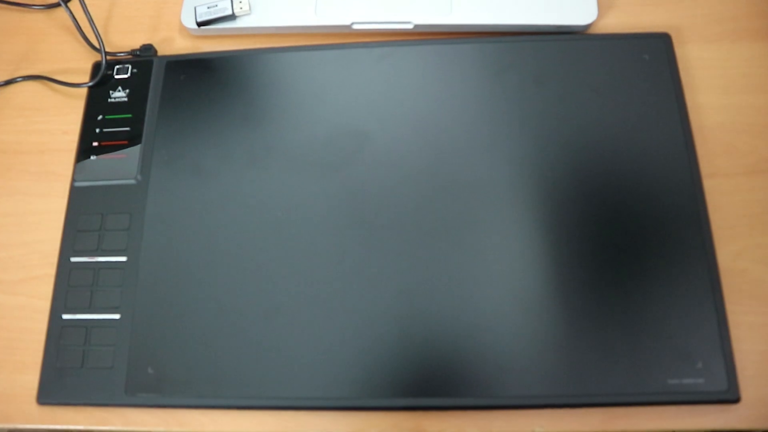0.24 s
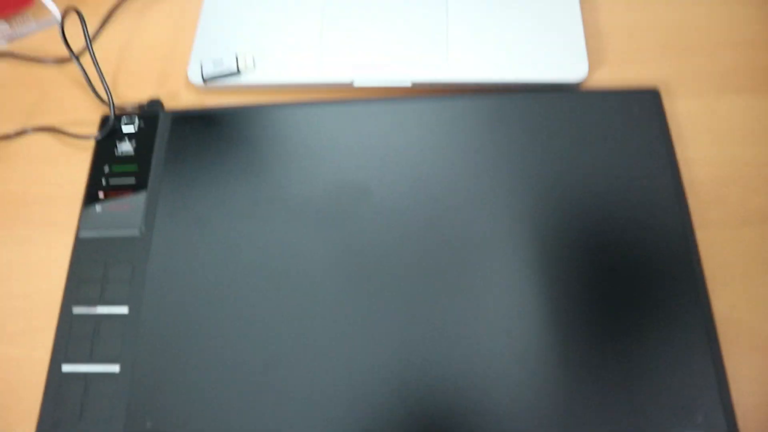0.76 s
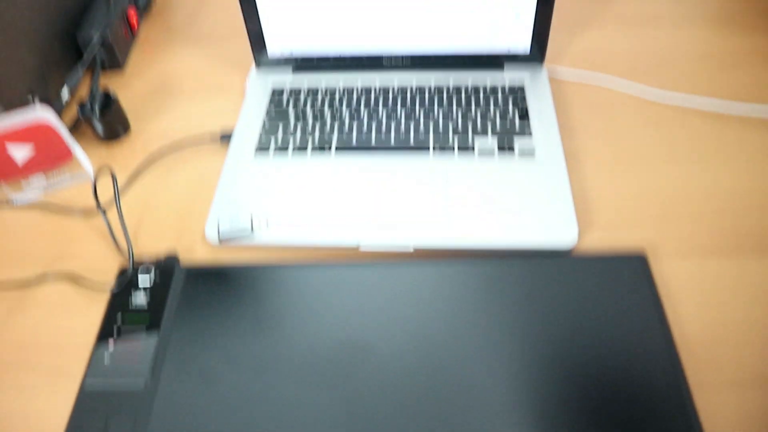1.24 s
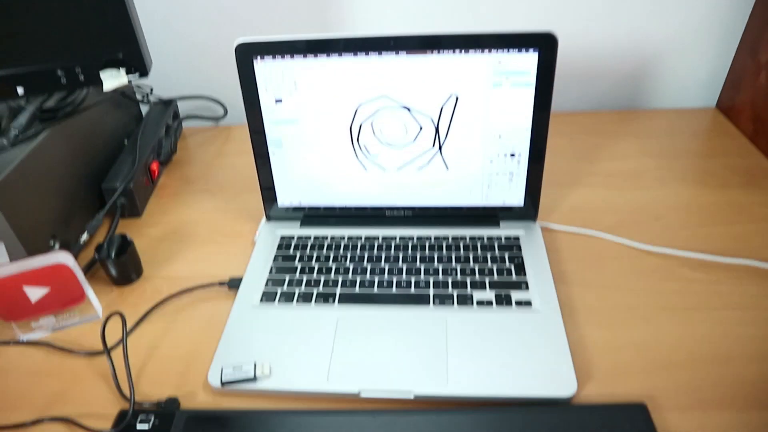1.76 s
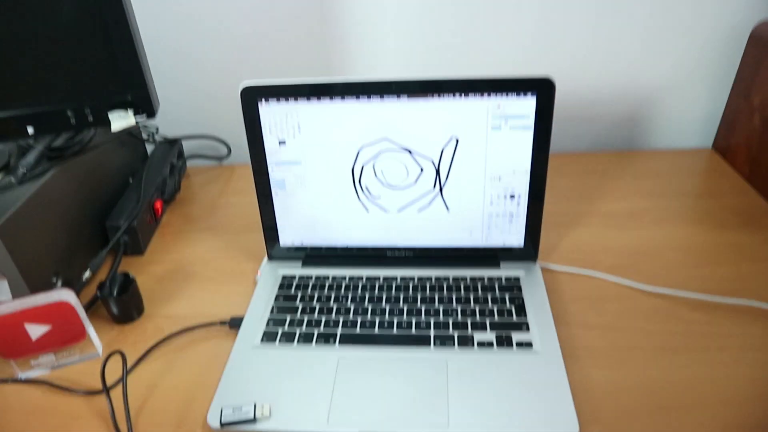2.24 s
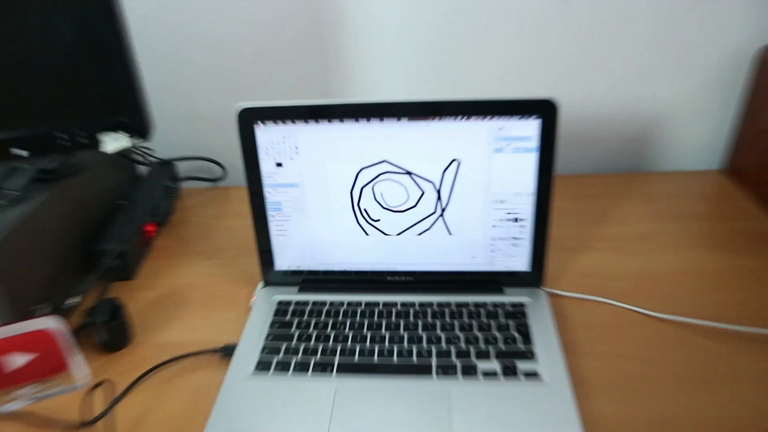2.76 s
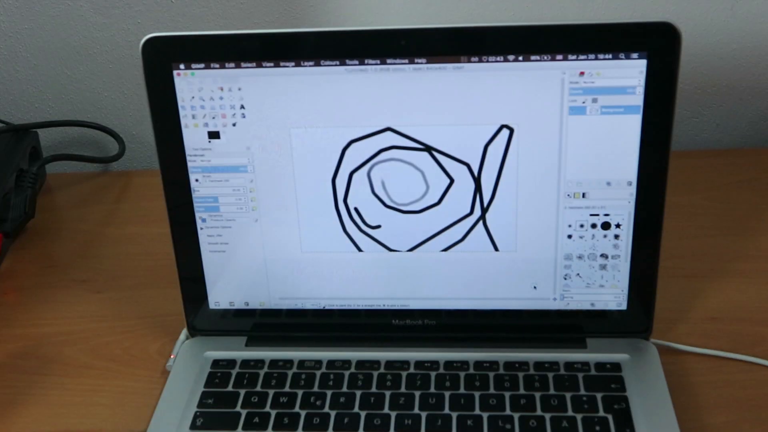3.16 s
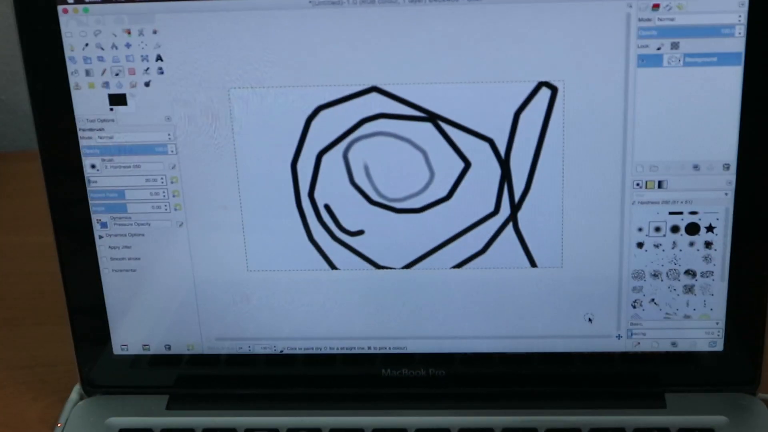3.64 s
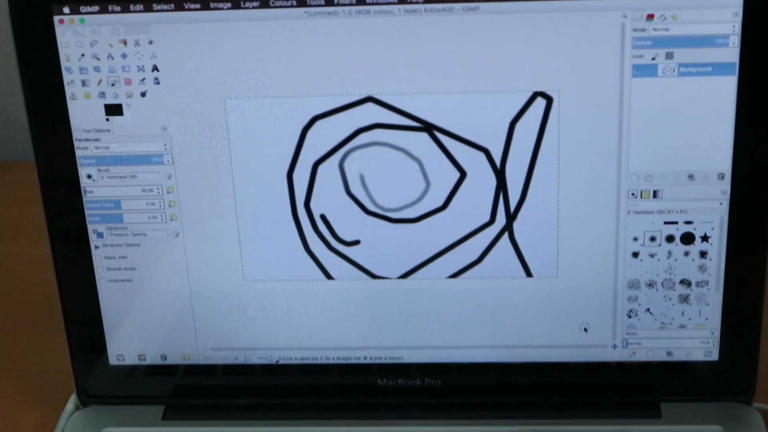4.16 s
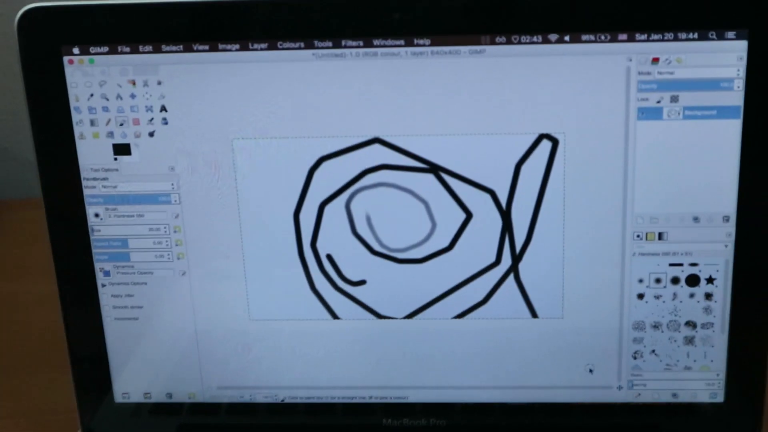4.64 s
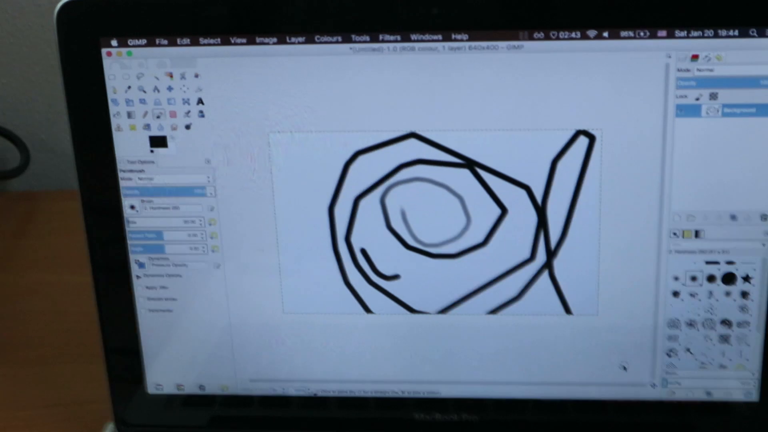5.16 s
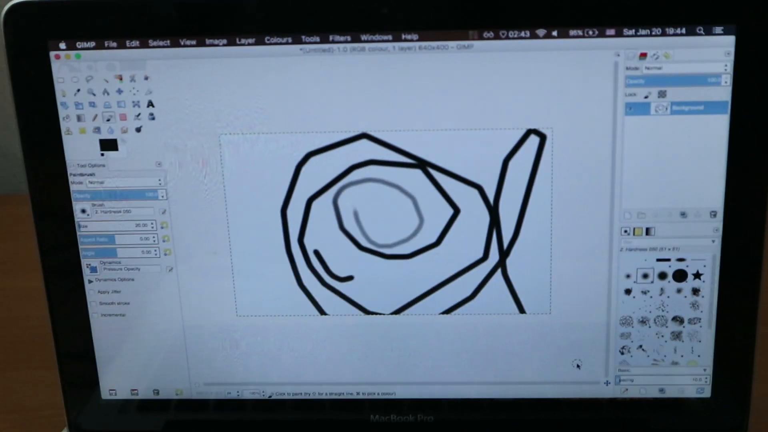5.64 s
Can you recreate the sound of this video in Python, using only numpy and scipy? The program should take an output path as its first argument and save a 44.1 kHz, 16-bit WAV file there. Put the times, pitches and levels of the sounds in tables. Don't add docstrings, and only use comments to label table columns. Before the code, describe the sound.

Irregular light plastic clicks, a few hard and bright, mix with short dry rubs and dull desk bumps in a quiet small room.

```python
import sys
import numpy as np
from scipy import signal
from scipy.fft import rfft, irfft, next_fast_len
from scipy.io import wavfile
from scipy.ndimage import uniform_filter1d, map_coordinates

SR = 44100
rng = np.random.default_rng(int(sys.argv[2]) if len(sys.argv) > 2 else 0)


def invert_db(level):
    return 10 ** (np.asarray(level, dtype=float) / 20)


def output_pcm(signal):
    pcm = np.clip(np.atleast_2d(signal).T, -1, 1) * 32767
    wavfile.write(sys.argv[1], SR, np.round(pcm).astype(np.int16))


N = 260190
IMPACT_T = np.arange(4096) / SR
LEAD = 256


def unit(x):
    return x / np.sqrt(np.mean(x ** 2) + 1e-20)


def peak_one(mid_side):
    return mid_side / np.abs(mid_side[0]).max()


def along(points, hz):
    f, v = np.transpose(points)
    return np.interp(np.log(hz + 1), np.log(f + 1), v)


def filtered(x, response):
    n = x.shape[-1]
    m = next_fast_len(n + 4096)
    spectrum = rfft(x, m) * response(np.fft.rfftfreq(m, 1 / SR))
    return irfft(spectrum, m)[..., :n]


def stereo(mid_side):
    mid, side = mid_side
    return np.array([mid + side, mid - side])


def wobble(rate):
    knots = rng.standard_normal(int(N * rate / SR) + 4)
    return map_coordinates(knots, [np.arange(N) * rate / SR])


def add(track, s, sound):
    at = round(s * SR)
    track[:, at:at + sound.shape[1]] += sound[:, :track.shape[1] - at]


def decay(t60):
    return invert_db(-60 * IMPACT_T / t60)


def resonances(modes, f, scatter_db):
    hz, width, mid_db, side_db = np.transpose(modes)[:, :, None]
    width = np.maximum(width, hz / 22)
    scatter = scatter_db * rng.standard_normal((2, len(modes), 1))
    gains = invert_db(np.array([mid_db, side_db]) + scatter)
    signs = (-1.) ** np.arange(len(modes))[:, None]
    bells = 1j * f * width / (hz ** 2 - f ** 2 + 1j * f * width)
    return np.sum(signs * gains * bells, axis=1) * [[1], [1j]]


# frequency in Hz, level in dB per Hz.
AIR = [(15, -36), (25, 1), (161, 0), (470, -8), (1010, -11), (2330, -18), (11500, -39), (15800, -60)]
AIR_SIDE = [(15, -82), (25, -36), (276, -6), (600, -15.5), (1390, -17.5), (1820, -15), (2520, -19.5),
            (15800, -36)]


def background():
    z = signal.stft(rng.standard_normal((2, N)), nperseg=512)[2]
    patches = uniform_filter1d(rng.standard_normal(z.shape[1:]), size=6, axis=0)
    patches = uniform_filter1d(patches, size=10, axis=1)
    pair = signal.istft(z * invert_db(2.2 * unit(patches)), nperseg=512)[1][:, :N]
    mid, side = filtered(pair, lambda f: invert_db([along(AIR, f), along(AIR_SIDE, f)]))
    level = invert_db(-55.5 + 0.66 * wobble(2.88))
    return level * stereo([unit(mid), invert_db(-5.0) * unit(side)])


# frequency in Hz, width in Hz, centre level in dB,
# level in dB of the part opposed left to right.
PANEL = [(627, 78, 1, -7), (1033, 119, -1, -5), (1332, 145, 1.5, -8), (1589, 56, -4.5, 3.5),
         (1705, 69.4, -6, -29), (1809, 32.4, -1.5, -31), (2103, 66, -3, 8), (2340, 153, -4.5, -1),
         (2640, 96, -3, 1), (3292, 260, -7, -31), (3680, 80, -26.5, -8.5), (4160, 67, -15.5, -6),
         (4840, 270, -53, -16.5)]


def panel(f, scatter_db):
    return resonances(PANEL, f, scatter_db)


# frequency in Hz, width in Hz, centre level in dB, opposed level in dB.
DESK = [(45.8, 14, -7.5, -21), (108, 31, 0, -35), (170, 95, 2.5, -15), (255, 187, 0.5, -14),
        (315.7, 103, 0.5, -6), (475, 79, -7, -8.5)]


def desk(f, scatter_db):
    return resonances(DESK, f, scatter_db)


def scratch(slips):
    nib = lambda f: 1 + invert_db(5.5) * 1j * f * 150 / (1370 ** 2 - f ** 2 + 1j * f * 150)
    return filtered(slips, lambda f: panel(f, 0) * [nib(f), invert_db(3 + 0 * f)])


# frequency in Hz, level in dB per Hz.
SCRAPE = [(1290, -93), (2200, -8.5), (4020, -11), (5870, -21), (9240, -23.5), (9800, -42), (11500, -33),
          (15800, -44)]
SCRAPE_SIDE = [(1290, -24), (2200, -2.5), (3460, -21), (4360, -8), (4980, -15), (7960, -27), (9470, -26),
               (15800, -45)]


def hiss(slips):
    grain = rng.standard_normal((2, N)) * invert_db(1.5 * wobble(150)) + 0.53 * unit(slips)
    return filtered(grain, lambda f: invert_db([along(SCRAPE, f), along(SCRAPE_SIDE, f) + 2.5]))


def rub():
    force = rng.standard_normal(N) * invert_db(4.5 * wobble(30))
    return filtered(force, lambda f: desk(f, 0))


# fastest moment in seconds, length in seconds, nib pressure in dB,
# hiss of speed relative to it in dB, weight of the hand in dB.
STROKES = [(0.108, 0.045, -40, -5.5, -43), (0.136, 0.046, -33, -3.5, -39), (0.322, 0.089, -49.5, -15, -49),
           (0.436, 0.1, -49.5, -23, -41), (0.503, 0.11, -39, -7.5, -40.5), (0.608, 0.21, -48, -14.5, -44),
           (1.124, 0.2, -58.5, -9.5, -50), (1.723, 0.46, -60, -11.5, -53.5), (1.904, 0.1, -51.5, -6.5, -60),
           (2.239, 0.032, -40.5, -19.5, -42.5), (2.558, 0.092, -48.5, -15, -59),
           (2.888, 0.16, -45, -13, -41.5), (2.988, 0.14, -36.5, -16, -38.5),
           (3.069, 0.089, -42.5, -14, -42), (3.187, 0.082, -47.5, -8, -41.5),
           (3.308, 0.047, -45.5, -18, -39), (3.454, 0.16, -41.5, -14, -39.5), (3.57, 0.12, -39, -15, -43.5),
           (3.681, 0.076, -50, -14.5, -55), (4.064, 0.023, -36.5, -8.5, -22.5),
           (4.836, 0.39, -74, -21, -51), (5.053, 0.13, -59.5, -27, -51), (5.386, 0.19, -51.5, -40, -44),
           (5.728, 0.11, -72.5, -19, -66.5)]


def strokes():
    END_DROP_DB, ROUNDNESS, QUICK_START = 21, 2.35, 1.06
    levels, t = np.full((3, N), -120.), np.arange(N) / SR
    for s, length, db, hiss_db, hand_db in STROKES:
        near = slice(max(round((s - 3 * length) * SR), 0), round((s + 3 * length) * SR))
        away = np.maximum(QUICK_START * (s - t[near]), t[near] - s) / (length / 2)
        swell = np.array([[db], [db + hiss_db], [hand_db]]) - END_DROP_DB * away ** ROUNDNESS
        levels[:, near] = np.maximum(levels[:, near], swell)
    sizes = rng.standard_normal(N) * invert_db(3.8 * rng.exponential(size=N))
    happens = rng.random(N) < 4000 / SR
    slips = sizes * happens * invert_db(1.7 * wobble(90))
    layers = [x / np.std(x[0]) for x in (scratch(slips), hiss(slips), rub())]
    balanced_db = levels + [[-1.5], [4], [-3]]
    return stereo(sum(invert_db(db) * x for db, x in zip(balanced_db, layers)))


def hardness_tilt(tick_db, f):
    upper_db = min(-3 + 0.41 * tick_db, -10.5)
    return invert_db((upper_db + 13.0) / (1 + (1620 / (f + 1)) ** 8))


def panel_ring(tick_db, spot_hz):
    GRAZE_S, GRAZE_DB, BOUNCE_S, BOUNCE_DB = .003, -18, .006, -10
    since = IMPACT_T - LEAD / SR
    contact = lambda late_s: np.sin(np.pi * np.clip((since - late_s) / 0.00012, 0, 1))
    early, late = rng.uniform(.6, 1.4, size=2)
    blow = contact(0) + invert_db(GRAZE_DB) * contact(-GRAZE_S * early) + invert_db(BOUNCE_DB) * contact(BOUNCE_S * late)
    chatter = .22 * rng.standard_normal(len(IMPACT_T)) * decay(.028) * (since > 0)
    spot_width = np.clip(0.047 * spot_hz, 180, 700)
    spot = lambda f: 1 + invert_db(7.5) / (1 + ((f - spot_hz) / spot_width) ** 2)
    treble_loss = lambda f: 1 + (f / 5500) ** 4
    response = lambda f: panel(f, 2.5) * hardness_tilt(tick_db, f) * spot(f) / treble_loss(f)
    return peak_one(filtered(blow + chatter, response))


def desk_knock():
    push = np.sin(np.pi * np.clip(IMPACT_T / 0.00074, 0, 1))
    push = push + 0.04 * rng.standard_normal(len(IMPACT_T)) * decay(0.019)
    direct = [[.6], [0]]
    return peak_one(filtered(np.roll(push, LEAD), lambda f: desk(f, 8.5) + direct))


# frequency in Hz, centre level in dB, side level in dB.
TICK = [(2440, 11, -37), (4420, 16, 18), (6560, 8.5, 11), (8560, 4.5, 6), (10100, -11.5, -11.5),
        (12640, -19.5, -16.5), (15500, -18.5, -16)]


def nib_tick():
    SEATING_S = .0027
    hz, mid_db, side_db = np.transpose(TICK)
    crack = rng.standard_normal(len(IMPACT_T)) * decay(.016) * (1 - np.exp(-IMPACT_T / .0008))
    clicks = crack + 0.87 * np.roll(crack, round(SEATING_S * SR))
    ports = lambda f: [1 + 0 * f, 1j * np.sign(np.cos(f / 700))]
    colour = lambda f: invert_db([along(np.c_[hz, mid_db], f), along(np.c_[hz, side_db], f)]) * ports(f)
    return peak_one(filtered(np.roll(clicks, LEAD), colour))


# frequency in Hz, level in dB.
FAR = [(60, -20), (200, 6), (550, 8.5), (1400, 2), (3000, 3), (4500, -8), (9000, -16), (14000, -85)]


def toward_walls(push_db, tick_db):
    impulse = 1. * (IMPACT_T == IMPACT_T[1024])[None]
    bass_db = lambda f: 0.9 * (push_db + 16.5) * (f < 600)
    treble_db = lambda f: .5 * (tick_db + 3) * (f > 4000)
    heard = lambda f: invert_db(along(FAR, f) + bass_db(f) + treble_db(f)) * hardness_tilt(tick_db, f)
    return filtered(impulse, heard)[:, 900:]


# start in seconds, peak in dB, push into the desk in dB, hardness in dB.
TOUCHES = [(0.126, -37, -13, 3), (0.303, -40.5, -14, -35), (0.477, -40, -3, -35), (0.582, -41.5, -6, -37),
           (1.863, -46, -3.5, -25), (2.555, -33, -7.5, -41), (2.648, -33, -11, -14), (2.837, -38, -3.5, -9),
           (3.143, -42.5, -21, -5), (3.176, -53, 1.5, -20), (3.304, -42, -25, -15), (3.393, -49.5, 8, -10),
           (3.417, -32, -3.5, -44), (3.543, -35, -34.5, -36), (3.97, -59, 12, -14.5),
           (4.737, -42, -17, -34), (4.872, -40.5, -1.5, -3), (4.934, -42, -1.5, -8),
           (4.942, -35.5, -23, -14.5), (4.965, -37.5, -18, -26.5), (5.022, -49, -1, -30),
           (5.044, -48.5, -5, -21), (5.067, -63.5, 9, -14), (5.097, -41.5, -10, -8),
           (5.297, -50.5, 1.5, -38), (5.412, -35, -23, -40), (5.598, -39.5, -9.5, -26),
           (5.669, -47, -12, -19), (5.76, -44.5, -5, -19), (5.889, -30, -21, -26)]
# start in seconds, peak in dB, push into the desk in dB, hardness in dB,
# favoured mode in Hz.
TAPS = [(0.138, -22, -26, -19, 1300), (0.458, -34.5, -7, 4.5, 1290), (0.485, -28.5, -12, -19, 1320),
        (0.509, -22.5, -12, -7.5, 1730), (0.651, -31.5, -13.5, -30, 2640), (0.716, -35.5, -7, 5.5, 3990),
        (0.737, -15, -8.5, -6.5, 2050), (1.941, -26.5, -18, -7.5, 3270), (2.004, -33.5, -5, -13, 2800),
        (2.249, -9.5, -11, 2.5, 1170), (2.58, -11.5, -11.5, -10, 2065), (3.218, -33, -27, 3.5, 1360),
        (3.904, -31, -9.5, -13, 1460), (3.997, -29.5, -10, -30, 1476), (4.061, -9.5, -17.5, -8.5, 1940),
        (4.295, -28, -11.5, -18.5, 1500), (4.314, -11, -12, -8, 556), (4.54, -27, -4.5, -19, 957),
        (4.55, -14.5, -9, -4.5, 1640), (4.779, -32.5, -10, -19.5, 1577), (5.354, -28, -13.5, -9, 1760),
        (5.429, -26, -7, -10.5, 956), (5.7, -33, -8.5, -14.5, 1404), (5.86, -33, -10.5, 1, 2210)]


def taps():
    TOUCH_HZ = 1480
    out, far = np.zeros((2, N)), np.zeros((2, N))
    for s, db, push_db, tick_db, spot_hz in [*TAPS, *((*row, TOUCH_HZ) for row in TOUCHES)]:
        ring = invert_db(db + 5.0) * panel_ring(tick_db, spot_hz)
        knock = invert_db(db + push_db + 11.0) * desk_knock()
        tick = invert_db(db + tick_db - 5.4) * nib_tick()
        add(out, s - LEAD / SR, ring + knock + tick)
        add(far, s, invert_db(db) * toward_walls(push_db, tick_db))
    return -stereo(out), far


# start in seconds, peak in dB, pitch in Hz.
THUMPS = [(0.178, -41.5, 207), (0.28, -41.5, 79), (0.423, -24, 168), (0.54, -26, 193), (0.639, -33, 328),
          (0.656, -32, 89), (0.749, -34, 110), (0.772, -28, 99), (1.654, -35, 104), (2, -48, 151),
          (2.599, -32, 111), (2.627, -31, 480), (3.155, -37, 120), (3.237, -37, 81), (3.305, -31.5, 137),
          (3.331, -39.5, 202), (4.079, -35, 176), (4.188, -34.5, 304), (4.33, -32, 149),
          (4.561, -19.5, 120.5), (4.599, -33.5, 113), (4.736, -34, 300), (4.947, -27.5, 169),
          (4.971, -36, 133), (5.07, -34.5, 121), (5.103, -38.5, 108), (5.325, -37.5, 110),
          (5.379, -34.5, 196), (5.67, -39, 170), (5.741, -35.5, 107)]


def thumps():
    out = np.zeros((2, N))
    for s, db, hz in THUMPS:
        ring = np.sin(2 * np.pi * hz * IMPACT_T) * decay(0.064) * (1 - np.exp(-IMPACT_T / 0.00073))
        press = rng.standard_normal(len(IMPACT_T)) * decay(0.029)
        blur = peak_one(filtered(press, lambda f: desk(f, 0)))
        add(out, s, invert_db(db) * (ring * [[1.3], [.02]] + 0.31 * blur))
    return stereo(out)


# frequency in Hz, 60 dB decay time in seconds.
ROOM = [(100, 0.32), (500, 0.16), (2500, 0.39), (6000, 0.34), (12000, 0.16)]
# frequency in Hz, level in dB.
WALLS = [(150, 12.5), (1000, 5.5), (3000, -2), (6000, -1.5), (9500, -8), (12000, 1)]


def room(x):
    out, step = np.zeros((2, N)), SR // 4
    for at in range(0, N, step):
        hz, t, z = signal.stft(rng.standard_normal((2, SR // 2)), SR, nperseg=256)
        shape = invert_db(along(WALLS, hz)[:, None] - 60 * t / along(ROOM, hz)[:, None])
        tail = signal.istft(z * shape, SR, nperseg=256)[1]
        tail = tail + filtered(tail[::-1] - tail, lambda f: .5 / (1 + (f / 400) ** 2))
        echo = signal.fftconvolve(x[:, at:at + step], tail / np.linalg.norm(tail[0]), axes=1)
        add(out, at / SR + .006, echo)
    return out


def scene():
    air = background()
    slides = strokes()
    nib, far = taps()
    hand = thumps() + slides
    leak = invert_db(-28) * filtered(nib, lambda f: 1 / (1 + (f / 3500) ** 4))
    return nib + hand + room(invert_db(-19.5) * hand + leak + invert_db(8.5) * far) + air


def roll_off(x):
    return signal.sosfilt(signal.butter(12, 15840, fs=SR, output="sos"), x)


def record(dry):
    held = dry / (1 + np.abs(dry / .9) ** 6) ** (1 / 6)
    mix = filtered(held, lambda f: 1j * f / (45 + 1j * f) * (f < 15900))
    return roll_off(mix)


dry = scene()
out = record(dry)
output_pcm(out)
```